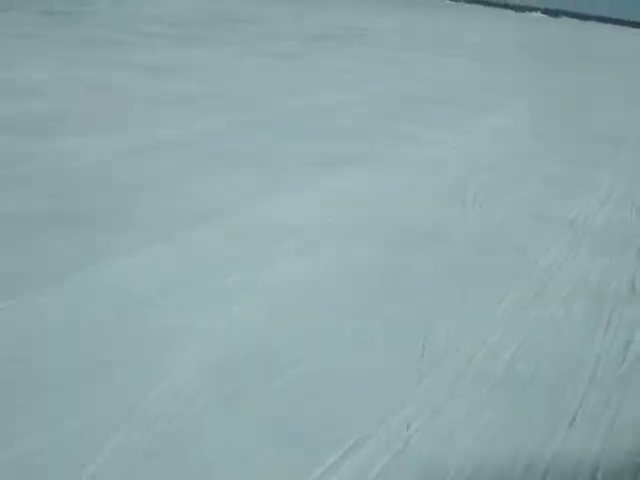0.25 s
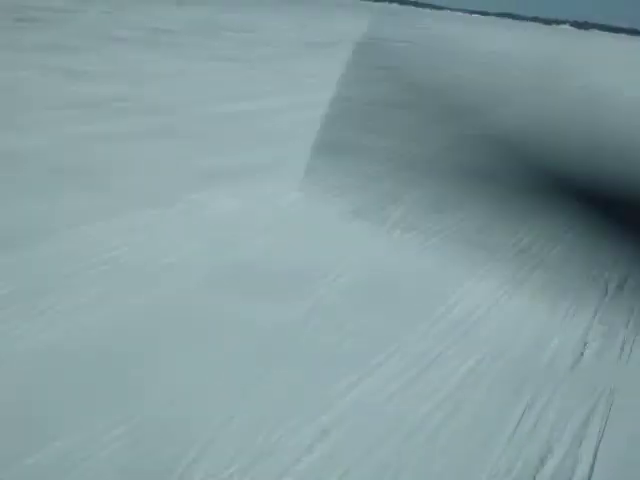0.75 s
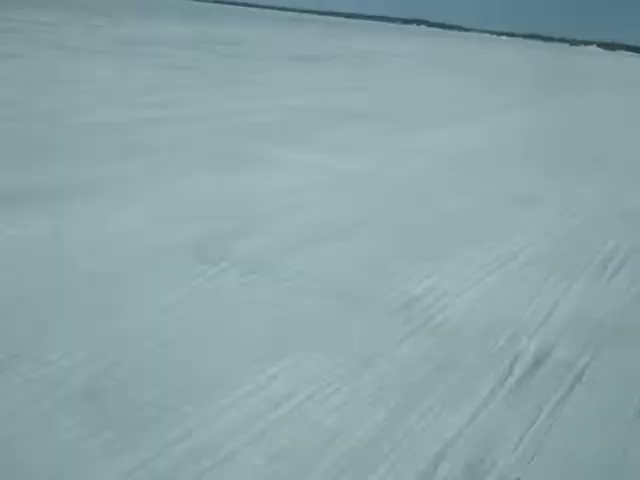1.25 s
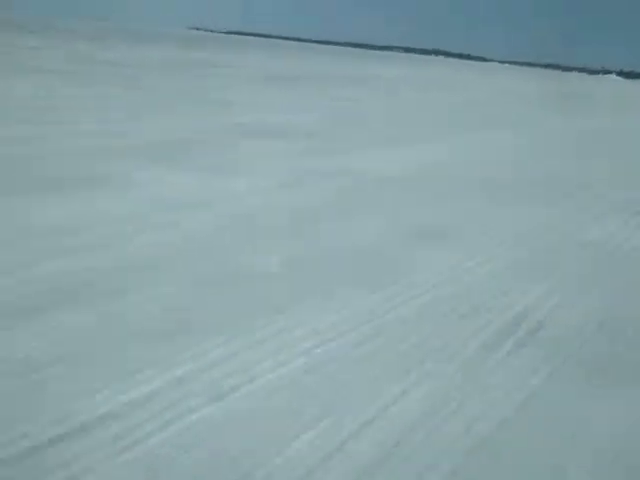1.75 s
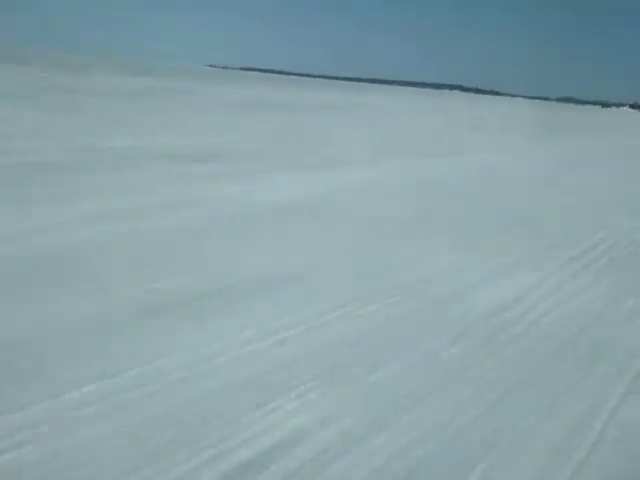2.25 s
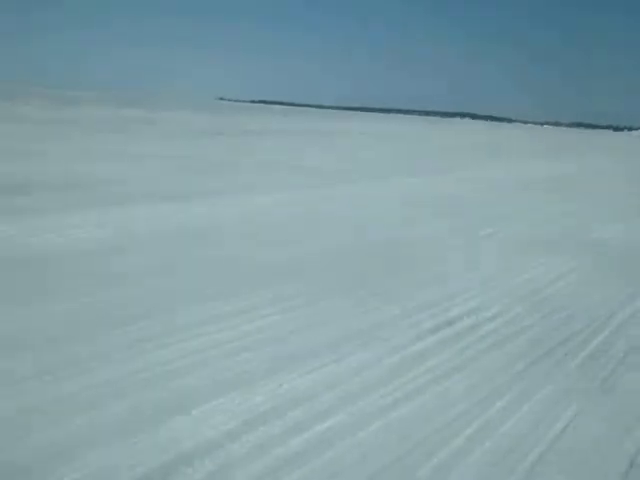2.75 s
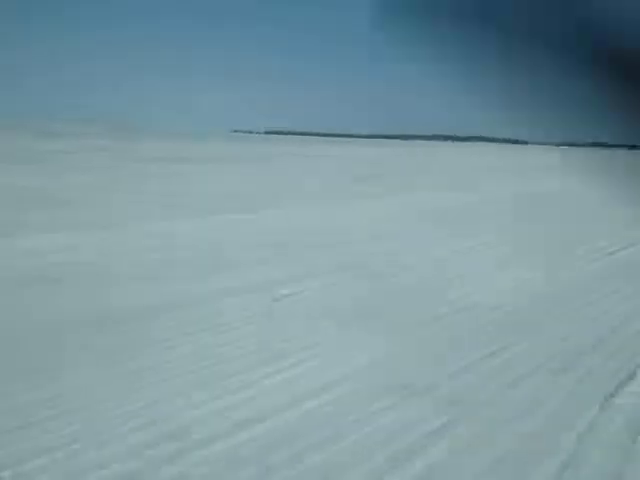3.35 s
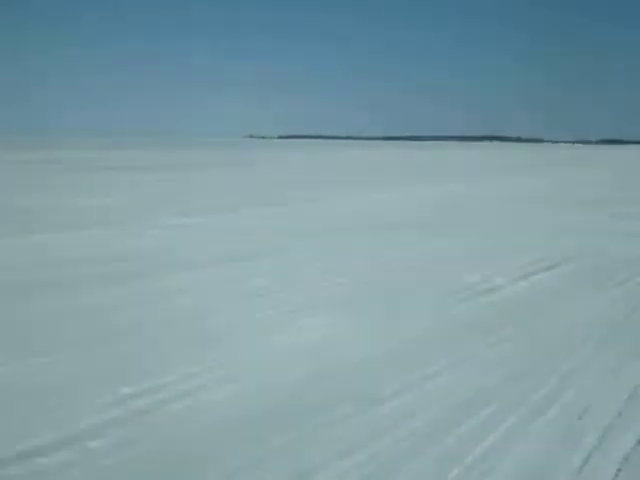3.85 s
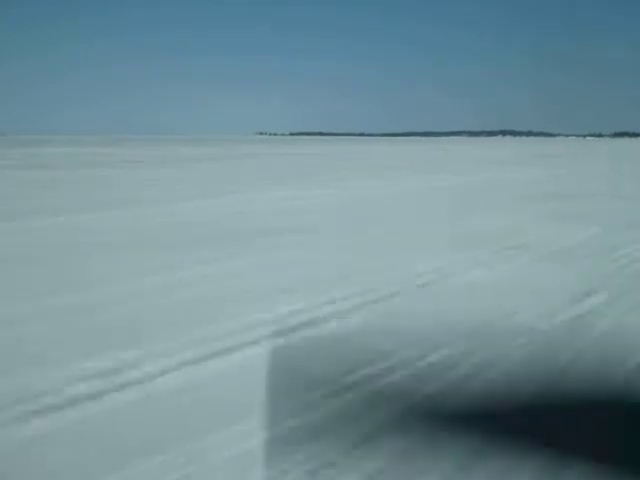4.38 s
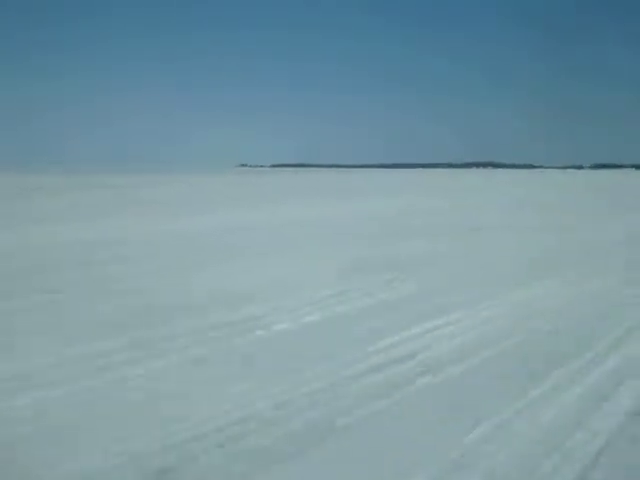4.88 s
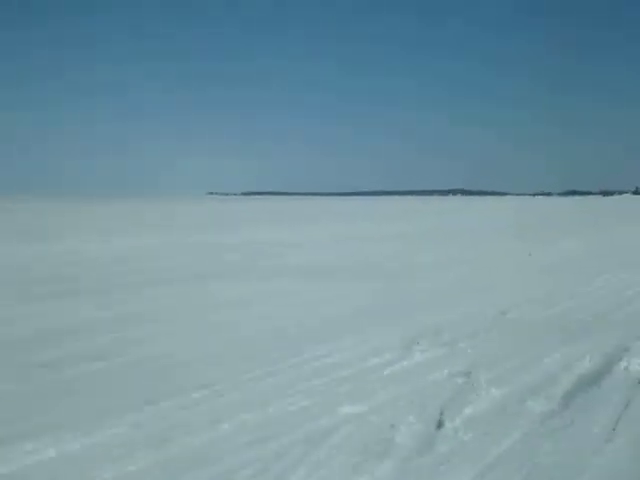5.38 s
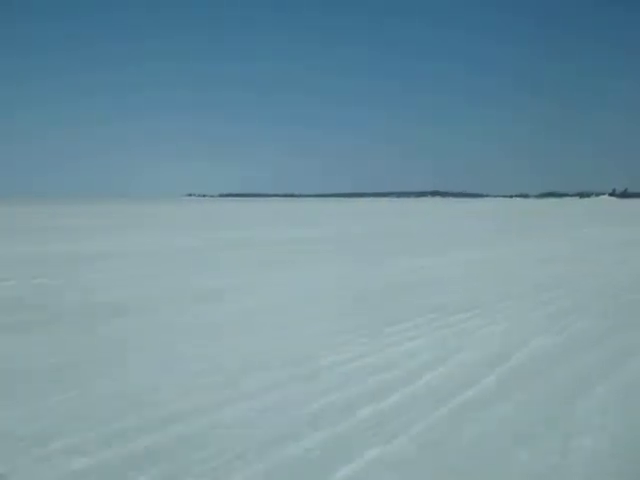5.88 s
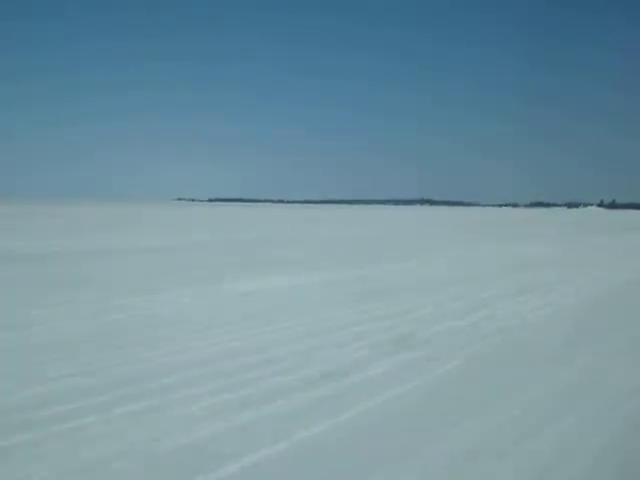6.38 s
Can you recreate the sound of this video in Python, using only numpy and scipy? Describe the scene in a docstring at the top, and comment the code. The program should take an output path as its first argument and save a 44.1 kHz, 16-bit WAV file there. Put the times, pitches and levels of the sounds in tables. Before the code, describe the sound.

Heard from inside a light aircraft running over snow on skis, a four-cylinder engine dips, revs up within the first second, holds strong, then drops after three seconds and settles lower and softer. Panels clatter, a steady hum sits beneath, fast engine knocks and faint valve ticks run throughout. Skis rumble and hiss, with hollow bumps, mostly early. A small camera makes it mid-heavy, with little deep bass and dulled top treble.

```python
"""A four-cylinder engine heard inside a light aircraft taxiing on skis: it picks up, holds, then eases off.
Tones at multiples of the firing rate boom; partly repeating noise clatters in the panels beside a steady hum.
Every engine cycle brings a knock of noise and ringing modes, with a softer answer, and four light valve ticks.
Underneath, shaped noise makes the skis rumble and hiss; short decaying tones and one noise thud are the bumps."""
import sys
import numpy as np
from scipy import signal
from scipy.fft import rfft, irfft
from scipy.io import wavfile
from scipy.ndimage import uniform_filter1d

SR = 44100
rng = np.random.default_rng(int(sys.argv[2]) if len(sys.argv) > 2 else 0)


def bounce(signal):
    """Save signal as a 16-bit WAV file at the path given by the first command-line argument."""
    frames = np.transpose(np.atleast_2d(signal))
    limited = np.clip(frames, -1, 1)
    pcm = np.round(limited * 32767).astype(np.int16)
    wavfile.write(sys.argv[1], SR, pcm)


N = 292383
TIME = np.arange(N) / SR  # s
BINS = np.fft.rfftfreq(N, 1 / SR)  # Hz

# Engine speed: time_s, firings_per_s
FIRING_RATE = [(0, 33.66), (.35, 32.66), (.9, 37.33), (1.3, 40.2), (2, 40.34), (2.85, 40.5), (3.15, 35.84),
               (3.6, 32.21), (4.4, 30.61), (5.5, 30.72), (6.63, 29.1)]
# How hard the aircraft works: time_s, engine_db, rumble_db (before the trim in skis)
EFFORT_CURVE = [(0.0, -29.5, -33.5), (0.45, -31, -32), (0.85, -28.5, -30.5), (1.3, -28, -28.5),
                (1.8, -29.5, -31.0), (2.4, -29, -31), (3.0, -28.5, -30), (3.15, -30.5, -35.5),
                (3.55, -30.5, -32), (4.1, -32, -35), (4.35, -34, -36), (5.0, -35.5, -39),
                (5.6, -35.5, -39.5), (6.2, -35.0, -40.5), (6.63, -35.5, -42)]
# Lowest engine tones: firing_multiple, rms_in_resonance_db, resonance_hz, width_hz, rms_far_off_db,
# far_off_lift_db (for each firing per second gained each second)
BOOM_TONES = [(1, -47.5, 34, 12, -55.5, -2), (2, -30.5, 81, 10, -52.5, 1.2), (3, -38.5, 106, 10, -56, 2.4)]
# Engine orders that stand out: cycle_rate_multiple, lift_db
STRONG_ORDERS = [(10, 4.5), (11, 4.5), (15, 1), (16, 5.5), (20, 3.5), (21, 3.5), (24, 4.5)]
# Relative spectrum of engine vibration in the panels: frequency_hz, level_db_per_hz
CLATTER_SPECTRUM = [(130, -30.5), (230, 0.5), (290, -0.5), (370, -2), (470, 1), (560, -2.5), (610, -9),
                    (720, -6.5), (1080, -8), (1170, -15.5), (1700, -14.5), (2200, -21), (2700, -24.5),
                    (4000, -59.5)]
# Relative spectrum of the airframe rumble: frequency_hz, level_db_per_hz
RUMBLE_SPECTRUM = [(20, -29.5), (45, -15), (70, -8.5), (105, -2), (165, -1), (200, -1.5), (300, -35),
                   (600, -62.5)]
# Relative spectrum of snow and air: frequency_hz, level_db_per_hz
HISS_SPECTRUM = [(1200, -22), (2400, -10), (3500, 5), (3900, 3), (4200, 4), (4500, 0), (5600, -4.5),
                 (5950, -7.5), (6250, -7), (6450, -11), (6900, -14.5), (7400, -36)]
# Relative spectrum of the valve ticks: frequency_hz, level_db_per_hz
TICK_SPECTRUM = [(2300, -18.5), (2950, -2), (3180, 0), (3450, -2.5), (3750, -13.5), (4600, -33)]
# Valve tick of each cylinder in firing order: place_in_cycle_firings, relative_level_db
VALVE_TICKS = [(.28, -6.5), (1.25, -4), (2.3, -4.5), (3.38, -4)]
# Relative spectrum of the knock's crack: frequency_hz, level_db_per_hz
KNOCK_SPECTRUM = [(200, -19.5), (500, -5), (900, -6.5), (1250, 5), (1600, 8.5), (1800, -5.5), (2200, 3),
                  (2600, -22), (4000, -19.5), (7000, -44)]
# What rings at every knock: pitch_hz, level_against_knock_db, decay_s
KNOCK_RINGS = [(1060, -14.5, 0.012), (1356, -8, 0.0092), (1569, -13, 0.0079), (1937, -18.5, 0.0025)]
# Engine cycles in which the knock barely catches: time_s
SOFT_KNOCK_TIMES = [.36, 1.03, 1.44, 1.54, 1.73, 1.93, 2.23, 2.53, 2.73, 3.03]
# Bumps under the skis, each ringing a part of the airframe: start_s, level_db (before trim), pitch_hz
SKI_BUMPS = [(0.156, -21, 750), (0.245, -13, 413), (0.609, -8, 540), (0.777, -16, 305), (0.877, -6, 290),
             (1.394, -14, 533), (1.889, -11, 542), (2.085, -5, 260), (2.286, -7, 546), (2.429, -11.5, 230),
             (3.46, -15, 948), (4.563, -13, 290), (5.364, -17, 538), (5.756, -22, 420), (6.425, -17, 505)]
# Relative spectrum of the ridge thud: frequency_hz, level_db_per_hz
THUD_SPECTRUM = [(40, -12), (80, 4), (150, -3), (300, 3), (550, -2.5), (800, -20), (2000, -50)]
# Panel resonances of the cabin: pitch_hz, width_hz, lift_db
PANEL_RESONANCES = [(112, 35, 4), (305.4, 54, 3.5), (532, 37, 5), (634, 30, 6.5), (822.4, 37, 5.5),
                    (959.6, 16, 6), (1076, 44, 4.5), (1187, 18, 7.5), (1296, 24, 3.5), (1593, 16, 6),
                    (1933, 30, 5), (3163, 43, 6)]

START_TURN = 0.04  # firings already elapsed at the start
FULL_EFFORT_DB = -29
KNOCK_RISE_S = 0.0006
NOTCH_HZ, EDGE_HZ = 2890, 7450


def amp(db):
    """Decibels to gain."""
    return 10 ** (np.asarray(db) / 20)


def unit(x):
    """Scales to rms 1."""
    return x / np.sqrt(np.mean(x ** 2) + 1e-20)


def curves(rows):
    """Each column of a timed table at every sample."""
    time_s, *columns = np.transpose(rows)
    return [np.interp(TIME, time_s, column) for column in columns]


def colour(x, points):
    """Shapes x with a spectrum drawn over log frequency, at rms 1."""
    hz, db = np.transpose(points)
    gain_db = np.interp(np.log(BINS + 1), np.log(hz), db)
    return unit(irfft(rfft(x) * amp(gain_db), N))


def noise():
    """White noise."""
    return rng.standard_normal(N)


def wander(rate_hz):
    """Slow chance movement, rms 1: noise rolled off around rate_hz."""
    return unit(irfft(rfft(noise()) * np.exp(-(BINS / rate_hz) ** 2), N))


def sine(hz):
    """A steady sine from phase zero."""
    return np.sin(2 * np.pi * hz * TIME)


def blow(start_s, rise_s, decay_s):
    """Envelope of one impact: a quick rise, then dying away."""
    age = np.maximum(TIME - start_s, 0)
    return (1 - np.exp(-age / rise_s)) * np.exp(-age / decay_s)


def shaking(turns, locked, size=8192, count=600):
    """Vibration that partly repeats with every engine cycle of four firings, and is partly new."""
    orders = np.exp(2j * np.pi * rng.random(count))
    for order, lift_db in STRONG_ORDERS:
        orders[round(order)] *= amp(lift_db)
    orders[[0, 4, 8, 12]] = 0  # no offset, and room for the boom's three tones
    cycle = irfft(orders, size)
    repeat = unit(np.interp(turns / 4 % 1, np.arange(size) / size, cycle, period=1))
    # the fresh part has the same power per Hz as the repeating part
    mean_cycle_hz = turns[-1] / 4 / TIME[-1]
    fresh = noise() * np.sqrt(SR / 2 / (count * mean_cycle_hz))
    share = np.clip(locked, 0, 1)
    return np.sqrt(share) * repeat + np.sqrt(1 - share) * fresh


def boom(turns, speed, waver_db=0.8):
    """Low firing-rate tones that swell near cabin resonances; away from them, speeding up shifts their level."""
    pull = uniform_filter1d(np.maximum(np.gradient(speed, TIME), 0), size=8000)
    out = 0
    for multiple, peak_db, hz, width_hz, far_db, pull_db in BOOM_TONES:
        multiple = round(multiple)
        near = np.exp(-((multiple * speed - hz) / width_hz) ** 2)
        level_db = near * peak_db + (1 - near) * (far_db + pull_db * pull)
        level_db = level_db + waver_db * wander(12)
        out = out + amp(level_db) * np.sin(2 * np.pi * (multiple * turns + rng.random()))
    return np.sqrt(2) * out  # sine levels are rms


def clatter(turns, effort_db, level_db=-29, follow=1.21, throb_db=0.46, throb_place=0.46, flutter_db=0.72):
    """Engine vibration in the panels, throbbing with the firings and fluttering by chance."""
    throb = throb_db * np.cos(2 * np.pi * (turns - throb_place)) + flutter_db * wander(56)
    panels = colour(shaking(turns, locked=0.46), CLATTER_SPECTRUM)
    return amp(level_db + follow * effort_db) * unit(panels * amp(throb))


def drone(effort_db, hz=212.7, level_db=-36, follow=0.7, waver_db=2.5, sway_rad=0.4):
    """A hum centred on one pitch whatever the engine speed; it wavers, and grows with effort."""
    gain = amp(level_db + follow * effort_db + waver_db * wander(6))
    return gain * np.sqrt(2) * np.sin(2 * np.pi * hz * TIME + sway_rad * wander(16))


def skis(turns, effort_db, rumble_db, rumble_trim_db=0.4, lurch_db=0.93, hiss_db=-51, hiss_follow=1.15,
         grain_db=0.3):
    """The airframe rumbles from engine and uneven snow; snow and air hiss."""
    rumble_gain = amp(rumble_db + rumble_trim_db + lurch_db * wander(7.3))
    rumble = rumble_gain * colour(shaking(turns, locked=0.58), RUMBLE_SPECTRUM)
    hiss_gain = amp(hiss_db + hiss_follow * effort_db + grain_db * wander(120))
    hiss = hiss_gain * colour(noise(), HISS_SPECTRUM)
    return rumble + hiss


def valves(turns, effort_db, level_db=-53, follow=1.0, width_firings=0.25):
    """A short bright tick from each cylinder in turn: noise gated by place in the cycle."""
    gate = 0
    for place, db in VALVE_TICKS:
        away = (turns - place + 2) % 4 - 2  # firings from the tick, wrapped round the cycle
        gate = gate + amp(db) * np.exp(-0.5 * (away / width_firings) ** 2)
    return amp(level_db + follow * effort_db) * unit(gate * colour(noise(), TICK_SPECTRUM))


def knocks(turns, effort_db, level_db=-25, follow=1.4, scatter_db=1, soft_db=-11, crack_db=-7.0, decay_s=0.008,
           tail_db=-12, tail_decay_s=0.064, answer_db=-10):
    """Once every four firings a knock cracks and rings; a softer crack answers half a cycle later."""
    envelope, strikes = np.zeros(N), np.zeros(N)
    cycle = turns / 4
    soft_cycles = np.round(np.interp(SOFT_KNOCK_TIMES, TIME, cycle))
    for at in np.flatnonzero(np.diff(np.floor(cycle))):
        db = level_db + follow * effort_db[at] + scatter_db * rng.standard_normal()
        db += soft_db * (round(cycle[at]) in soft_cycles)
        crack = blow(TIME[at], KNOCK_RISE_S, decay_s)
        crack += amp(tail_db) * blow(TIME[at], KNOCK_RISE_S, tail_decay_s)
        answer_s = np.interp(cycle[at] + 0.5, cycle, TIME)
        answer = amp(answer_db) * blow(answer_s, KNOCK_RISE_S, decay_s)
        envelope += amp(db + crack_db) * np.hypot(crack, answer)
        strikes[at] = amp(db)
    ring = sum(amp(db) * blow(0, KNOCK_RISE_S, fade_s) * sine(hz) for hz, db, fade_s in KNOCK_RINGS)
    return envelope * colour(noise(), KNOCK_SPECTRUM) + signal.fftconvolve(strikes, ring)[:N]


def bumps(trim_db=-6, rise_s=0.0029, decay_s=0.006, ridge_s=5.1, ridge_db=-32.0, ridge_rise_s=0.008,
          ridge_decay_s=0.09):
    """Short hollow knocks from the skis as decaying sines, and one longer noise thud at a ridge."""
    out = amp(ridge_db) * blow(ridge_s, ridge_rise_s, ridge_decay_s) * colour(noise(), THUD_SPECTRUM)
    for start_s, db, hz in SKI_BUMPS:
        tone = np.sin(2 * np.pi * hz * (TIME - start_s))
        out += amp(db + trim_db) * blow(start_s, rise_s, decay_s) * tone
    return out


def cabin(x, trim_db=-1.5):
    """Panel resonances colour the sound and ring on after each blow."""
    rings = sum((amp(db) - 1) / (1 + 2j * (BINS - hz) / width_hz) for hz, width_hz, db in PANEL_RESONANCES)
    return amp(trim_db) * irfft(rfft(x) * (1 + rings), N)


def scene():
    """Engine and skis heard from the cabin; clatter, hum, ticks, knocks and hiss follow the effort."""
    speed = curves(FIRING_RATE)[0]
    engine_db, rumble_db = curves(EFFORT_CURVE)
    effort_db = engine_db - FULL_EFFORT_DB
    turns = START_TURN + np.cumsum(speed) / SR  # counted in firings
    engine = clatter(turns, effort_db) + valves(turns, effort_db) + knocks(turns, effort_db)
    ground = skis(turns, effort_db, rumble_db) + bumps()
    mix = cabin(engine + ground) + boom(turns, speed) + drone(effort_db)
    return mix[None]


def record(dry, notch_width_hz=110, low_cut_hz=25):
    """A small camera's tone: a steep bass cut, one narrow notch in the treble and a low band limit."""
    away_hz = BINS - NOTCH_HZ
    bass_cut = 1 / np.sqrt(1 + (low_cut_hz / (BINS + 1)) ** 10)
    notch = away_hz / (away_hz - 1j * notch_width_hz)
    heard = irfft(rfft(dry) * bass_cut * notch, N)
    low_pass = signal.firwin(401, EDGE_HZ, window=("kaiser", 9), fs=SR)
    return signal.oaconvolve(heard, low_pass[None], "same")


dry = scene()
out = record(dry)
bounce(out)
```